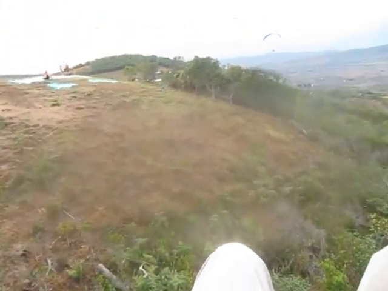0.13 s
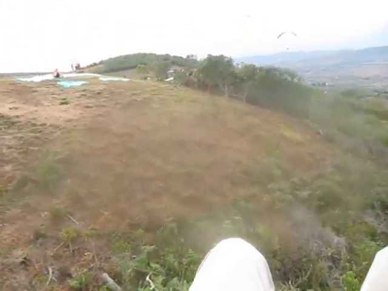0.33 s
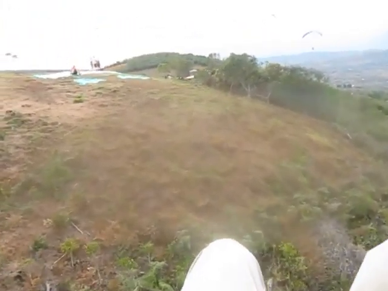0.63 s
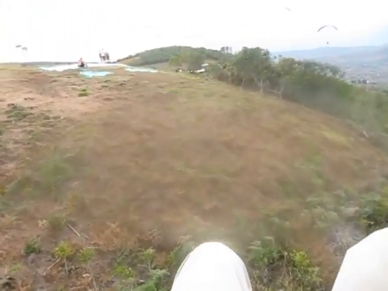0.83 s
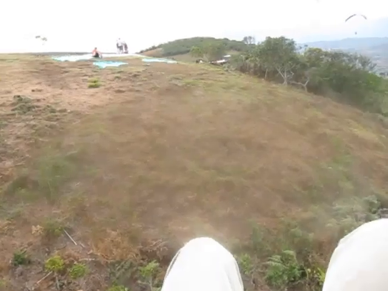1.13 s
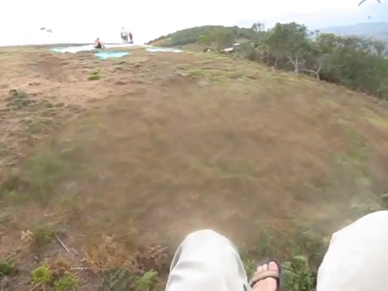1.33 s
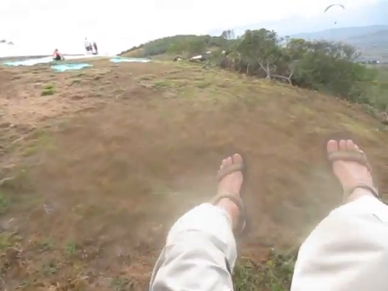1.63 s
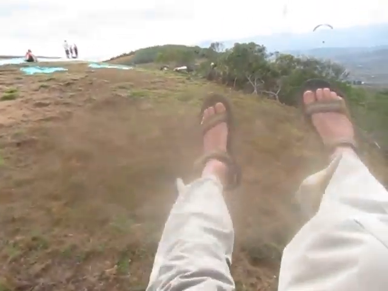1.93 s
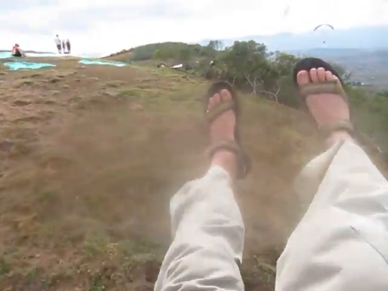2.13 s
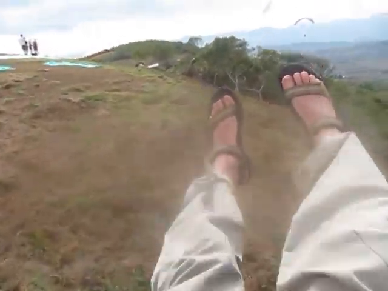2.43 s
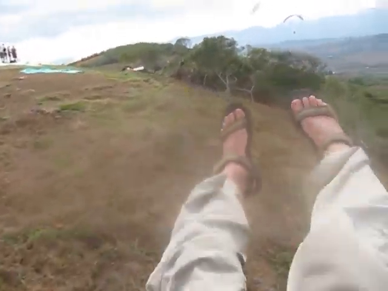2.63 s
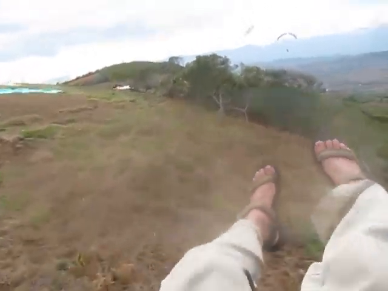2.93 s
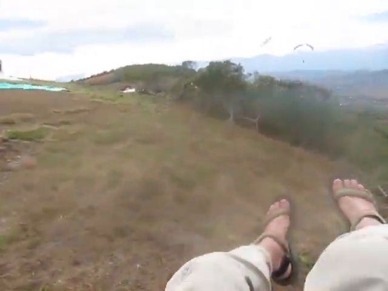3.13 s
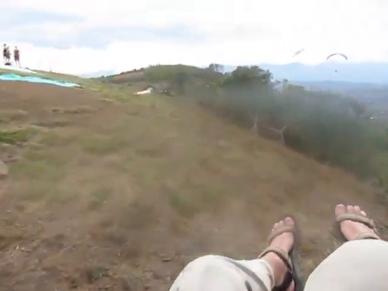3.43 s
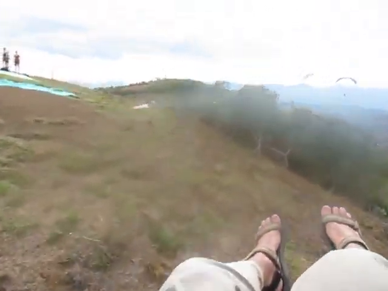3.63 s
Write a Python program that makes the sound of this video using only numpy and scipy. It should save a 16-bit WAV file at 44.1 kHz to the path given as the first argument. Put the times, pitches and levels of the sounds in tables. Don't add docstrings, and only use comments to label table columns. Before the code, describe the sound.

Wind buffets a small camera microphone during low flight over an open hillside: uneven deep rumble and thumps, swelling after two seconds, with hollow air rush, one buckle knock and late faint ticks.

```python
import sys
import numpy as np
from scipy import signal
from scipy.fft import rfft, irfft
from scipy.io import wavfile
from scipy.ndimage import uniform_filter1d

SR = 44100
rng = np.random.default_rng(int(sys.argv[2]) if len(sys.argv) > 2 else 0)


def generate_wav(sig):
    pcm = np.round(np.clip(np.atleast_2d(sig).T, -1, 1) * 32767).astype(np.int16)
    wavfile.write(sys.argv[1], SR, pcm)


def voltage_ratio(decibels):
    exponent = np.asarray(decibels, float) / 20
    return 10 ** exponent


N = 166257

# (time [s], port rush level [dB], capsule buffeting level [dB])
GUST = [(0, -46.5, -40), (.22, -47, -41), (.42, -45, -38.5), (.76, -46.5, -37.5), (.86, -49, -43),
        (.92, -53, -42), (1.15, -50.5, -40), (1.45, -52, -39.5), (1.6, -49.5, -40.5), (1.96, -47, -36.5),
        (2.3, -42, -34.5), (2.45, -44, -33), (2.59, -41, -38), (2.76, -45.5, -30.5), (3.1, -44.5, -34.5),
        (3.19, -42, -35.5), (3.4, -44, -34), (3.77, -43, -38.5)]
# (frequency [Hz], density [dB per Hz])
HISS_COLOUR = [(1500, -39), (2500, -4), (4800, -6.5), (7000, -7.5), (10100, -10), (13000, -15),
               (17000, -22.5)]
# (frequency [Hz], peak level [dB], phase wander [rad])
WHINES = [(7484, -83, .6), (9729, -79, 3.0), (15734, -91, .6)]
# (start [s], end [s], frequency [Hz], width [Hz], level [dB rms])
CORDS = [
    (.3, 1.285, 1680, 45, -62),
    (1.97, 3.8, 1870, 70, -58),
    (0, 1.1, 2350, 56, -65),
]
# (frequency [Hz], level [dB], T60 [s])
KNOCK_MODES = [(1110, -27, .009), (3330, -35, .011)]
# (frequency [Hz], density [dB per Hz])
CRACK_COLOUR = [(800, -4), (2000, -2), (3400, -4), (4400, -10), (7500, -8), (11000, -13), (14000, -25),
                (15500, -45)]
# (time [s], level [dB], pitch factor [ratio])
TICKS = [
    (3.6122, -50, 1.0),
    (3.637, -58, 1.0),
    (3.655, -57, 1.0),
]
# (frequency [Hz], level [dB], T60 [s])
TICK_MODES = [(4300, -4, .018), (6700, -9, .015), (7950, 0, .018), (8500, -3, .015), (11200, -8, .02)]
# (frequency [Hz], density [dB per Hz])
RUSH_COLOUR = [(200, -10), (400, -0.5), (800, -1), (1400, -3.5), (2200, -6), (3500, -13.5), (5500, -28),
               (10000, -37.5)]
# (frequency [Hz], width [Hz], lift [dB], negative = notch)
HOLLOWS = [(542, 53, 2), (1386, 110, 3), (1640, 150, 2.5), (1880, 200, 2.5), (2140, 130, -1),
           (2344, 127, 6.5), (2777, 410, -5), (3137, 160, 5.5), (3673, 240, -9.5), (4000, 80, 3.5),
           (4310, 280, 4), (5090, 300, 4.5)]
# (frequency [Hz], density [dB per Hz])
BUFFET_COLOUR = [(10, 1.5), (30, -2.5), (55, -6), (95, -13), (235, -20.5), (270, -25.5), (320, -25.5),
                 (370, -35)]
# (time [s], peak level [dB], length [s],
# sign [+1 push, -1 suck])
EDDIES = [(.05, -27.5, 0.0082, -1), (0.547, -27.5, 0.011, -1), (0.555, -35, .014, 1),
          (0.749, -27, 0.0093, -1), (1.023, -28.5, 0.018, 1), (1.311, -32, 0.015, 1), (1.369, -31, .016, 1),
          (1.424, -29, 0.014, -1), (1.625, -27.5, 0.015, -1), (1.635, -32, 0.014, 1),
          (2.149, -22, 0.014, -1), (2.491, -20, .011, -1), (2.655, -21, 0.0096, 1), (2.805, -22, 0.016, -1),
          (2.923, -22.5, 0.018, 1), (3.246, -25.5, 0.0092, 1), (3.399, -22.5, 0.0066, -1),
          (3.458, -24, .01, -1), (3.667, -25.5, 0.017, -1), (3.772, -27, 0.013, -1)]


def level(x, rms_db):
    return x * voltage_ratio(rms_db) / np.sqrt(np.mean(x ** 2))


def smooth_twice(x, first, second):
    return uniform_filter1d(uniform_filter1d(x, first), second)


def walk(rate_hz):
    hold = int(SR / rate_hz)
    steps = np.repeat(rng.standard_normal(N // 100), hold)[:N + 2 * hold]
    return 1.06 * smooth_twice(steps, hold, hold)[:N]


def noise(colour, lift_db=0, edge_db_per_octave=-24):
    hz = np.maximum(np.fft.rfftfreq(N, 1 / SR), 1)
    table_hz, table_db = np.array(colour).T
    octaves_below = np.maximum(np.log2(table_hz[0] / hz), 0)
    octaves_above = np.maximum(np.log2(hz / table_hz[-1]), 0)
    colour_db = np.interp(np.log(hz), np.log(table_hz), table_db)
    edge_db = edge_db_per_octave * (octaves_below + octaves_above)
    return hz, rfft(rng.standard_normal(N)) * voltage_ratio(colour_db + edge_db + lift_db)


def gusty(hz, spectrum, centres_hz, gust_db, pivot_hz, brighten, shared_db, own_db, rate_hz):
    out = 0
    shared = walk(rate_hz)
    slow = int(0.2 * SR)
    place = np.interp(np.log(hz), np.log(centres_hz), np.arange(len(centres_hz)))
    for k, centre_hz in enumerate(centres_hz):
        weight = np.maximum(1 - np.abs(place - k), 0)
        band = irfft(spectrum * weight, N) * voltage_ratio(shared_db * shared + own_db * walk(rate_hz))
        band = band * np.sqrt(np.mean(band ** 2) / smooth_twice(band ** 2, slow, slow // 2))
        tilt_db_per_db = brighten * np.log2(centre_hz / pivot_hz)
        out = out + band * voltage_ratio(tilt_db_per_db * (gust_db - np.mean(gust_db)))
    return out * voltage_ratio(gust_db) / np.sqrt(np.mean(out ** 2))


def ring(start_s, modes, rise_s):
    t = np.maximum(np.arange(N) / SR - start_s, 0)
    swell = np.minimum(t / rise_s, 1) ** 2
    out = 0
    for hz, db, t60_s in modes:
        decay_db = -60 * np.maximum(t - rise_s, 0) / t60_s
        out = out + voltage_ratio(db + decay_db) * swell * np.sin(2 * np.pi * hz * t)
    return out


def circuit():
    t = np.arange(N) / SR
    hiss = level(irfft(noise(HISS_COLOUR, edge_db_per_octave=-6)[1], N), -61.5) * voltage_ratio(0.46 * walk(12))
    whines = 0
    for hz, db, wander_rad in WHINES:
        phase = 2 * np.pi * hz * t + wander_rad * walk(30)
        whines = whines + voltage_ratio(db + 1.5 * walk(8)) * np.sin(phase)

    first_s, every_s, long_s = 0.041, 1.0, 0.117
    f = np.fft.rfftfreq(N, 1 / SR)
    white = rfft(rng.standard_normal(N))
    high = level(irfft(white * np.exp(-((f - 15600) / 1800) ** 2), N), -73)
    broad = level(irfft(white * np.exp(-((f - 9000) / 3500) ** 2), N), -71.5)
    gate = 1.0 * ((t - first_s) % every_s < long_s)
    burst = uniform_filter1d(gate, 700) * voltage_ratio(2.5 * walk(30)) * (high + broad)
    return hiss + whines + burst


def cords():
    t, f = np.arange(N) / SR, np.fft.rfftfreq(N, 1 / SR)
    fade_s = 0.1
    out = 0
    for start_s, end_s, hz, width_hz, db in CORDS:
        resonance = 1 / (1 + (2 * (f - hz) / width_hz) ** 2)
        tone = irfft(rfft(rng.standard_normal(N)) * resonance, N)
        tone = level(tone * voltage_ratio(2.5 * walk(10)), db)
        out = out + tone * np.clip(np.minimum(t - start_s, end_s - t) / fade_s + 0.5, 0, 1)
    return out


def buckle():
    knock_s, knock_rise_s = 1.9772, 0.0031
    crack_rise_s, crack_hold_s, crack_t60_s = 0.0012, 0.0025, 0.028
    t = np.arange(N) / SR - knock_s
    decay_db = -60 * np.maximum(t - crack_hold_s, 0) / crack_t60_s
    envelope = np.clip(t / crack_rise_s, 0, 1) * voltage_ratio(decay_db)
    crack = level(irfft(noise(CRACK_COLOUR)[1], N), -45) * envelope
    ticks = 0
    for start_s, db, pitch in TICKS:
        modes = [(hz * pitch, mode_db, t60_s) for hz, mode_db, t60_s in TICK_MODES]
        ticks = ticks + voltage_ratio(db) * ring(start_s, modes, 0.0013)
    return ring(knock_s, KNOCK_MODES, knock_rise_s) + crack + ticks


def rush(gust_db):
    f = np.fft.rfftfreq(N, 1 / SR)
    lift_db = sum(db / (1 + (2 * (f - hz) / width_hz) ** 2) for hz, width_hz, db in HOLLOWS)
    hz, spectrum = noise(RUSH_COLOUR, lift_db)
    centres_hz = 300 * 2 ** np.arange(0, 5.5, 0.5)
    return gusty(hz, spectrum, centres_hz, gust_db, pivot_hz=1160, brighten=0.31,
                 shared_db=1.0, own_db=0.53, rate_hz=16)


def buffet(gust_db, rush_db):
    hz, spectrum = noise(BUFFET_COLOUR)
    centres_hz = 16 * 2 ** np.arange(0, 5.5, 0.5)
    rumble = voltage_ratio(2) * gusty(hz, spectrum, centres_hz, gust_db, pivot_hz=43, brighten=0.068,
                            shared_db=0.66, own_db=1.0, rate_hz=12)

    split_hz, small_lift_db = 106, 10.5
    small = irfft(rfft(rumble) / (1 + (split_hz / hz) ** 4), N)
    rumble = rumble + small * (voltage_ratio(0.66 * (rush_db + small_lift_db - gust_db)) - 1)
    deep = irfft(rfft(rumble) * np.minimum(60 / hz, 1), N)

    rebound, calm_share = 0.36, 0.38
    t = np.arange(N) / SR
    thumps, calm = 0, 0
    for time_s, db, long_s, sign in EDDIES:
        u = (t - time_s) / long_s
        push = (1 + rebound) * np.exp(-np.abs(1.92 * u) ** 1.62)
        swing_back = rebound * np.exp(-(u / 2.7) ** 2)
        thumps = thumps + np.sign(sign) * voltage_ratio(db) * (push - swing_back)
        calm = np.maximum(calm, np.exp(-(u / 1.64) ** 2))
    return rumble - calm_share * calm * deep + thumps


def scene():
    t = np.arange(N) / SR
    time_s, rush_points_db, buffet_points_db = np.array(GUST).T
    rush_db = np.interp(t, time_s, rush_points_db)
    buffet_db = np.interp(t, time_s, buffet_points_db)
    mix = circuit() + cords() + buckle() + rush(rush_db) + buffet(buffet_db, rush_db)
    return mix[None]


def roll_off(x):
    return signal.sosfilt(signal.butter(12, 17140, fs=SR, output="sos"), x)


def record(dry):
    return roll_off(dry)


dry = scene()
out = record(dry)
generate_wav(out)
```